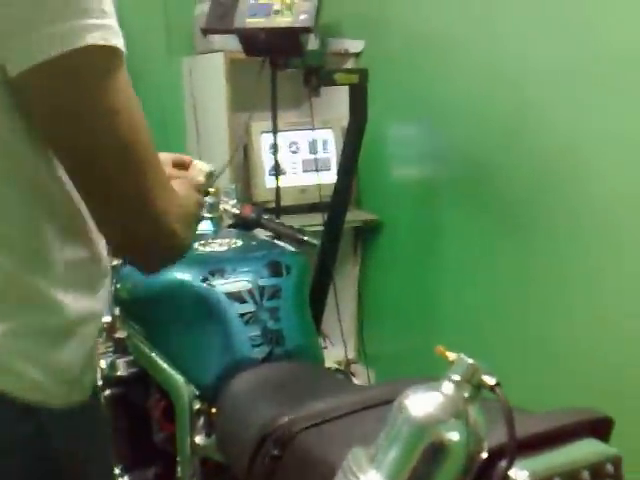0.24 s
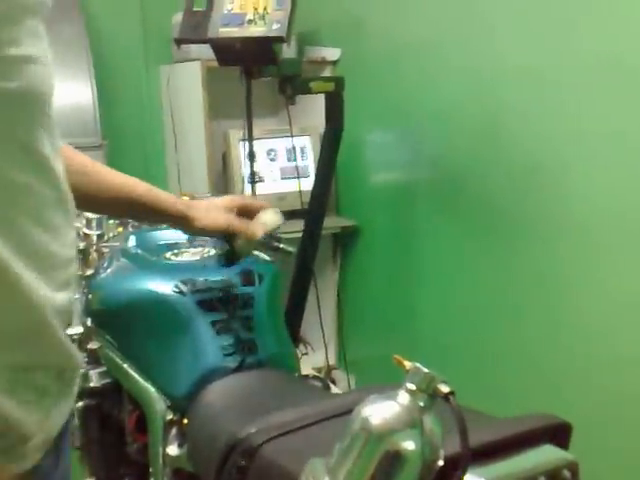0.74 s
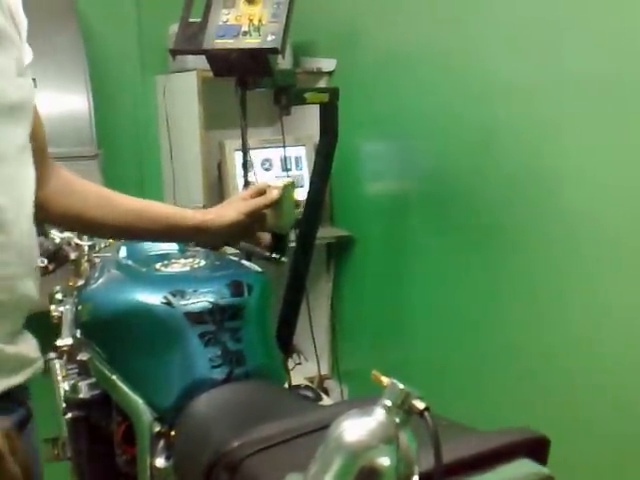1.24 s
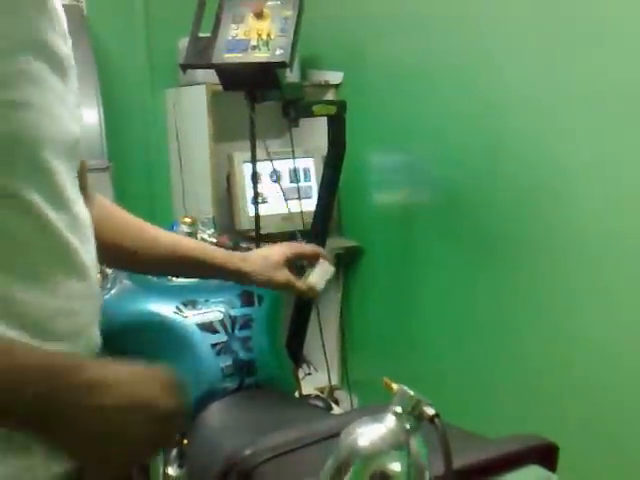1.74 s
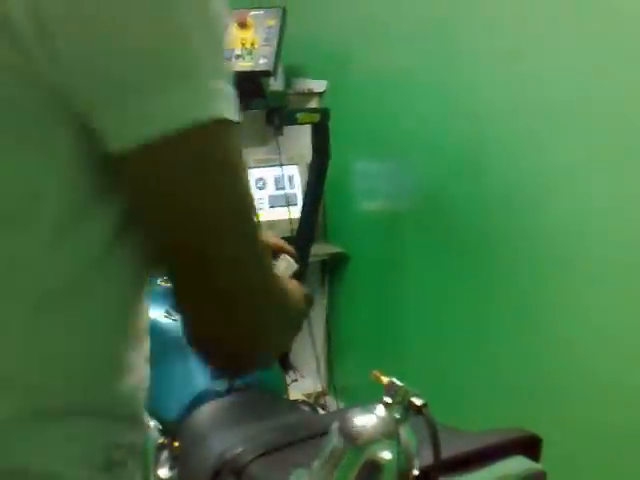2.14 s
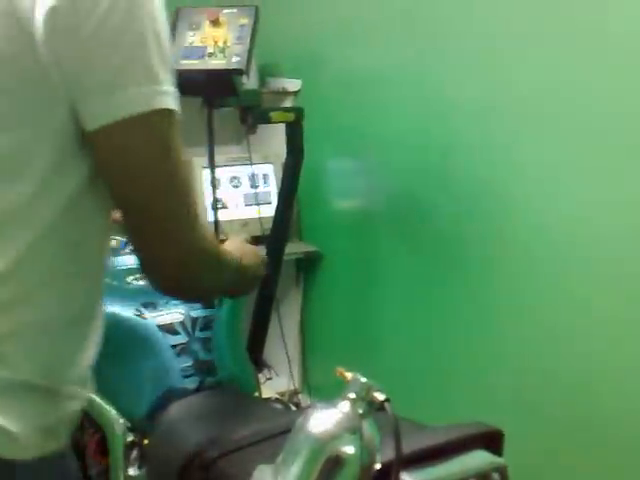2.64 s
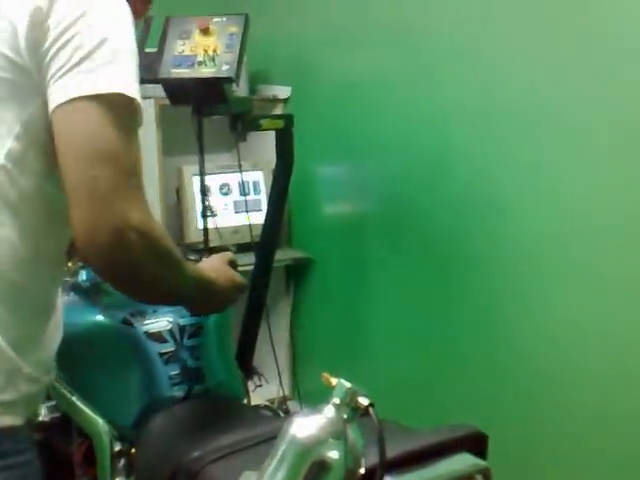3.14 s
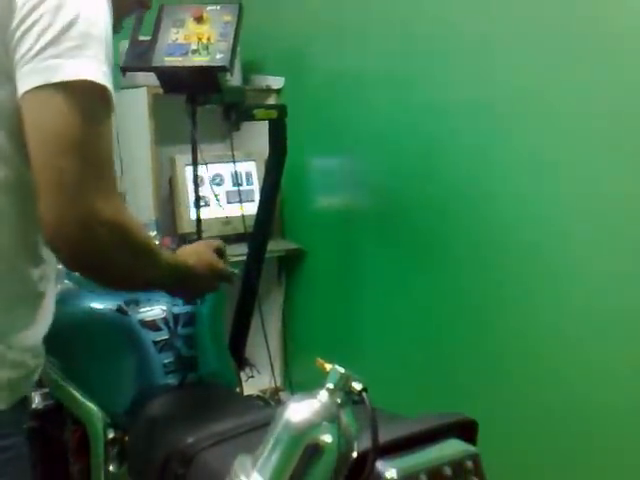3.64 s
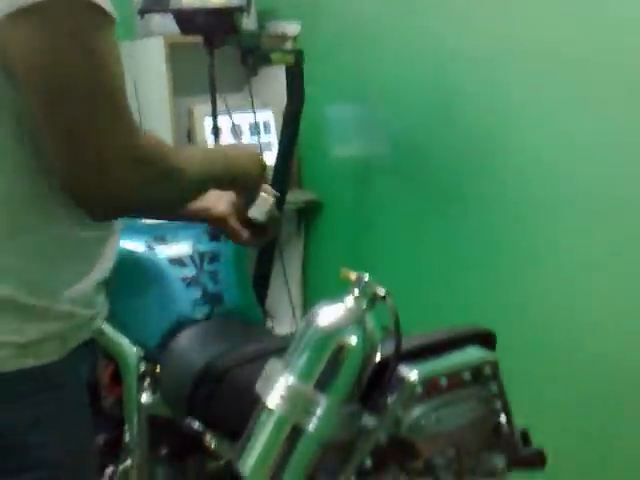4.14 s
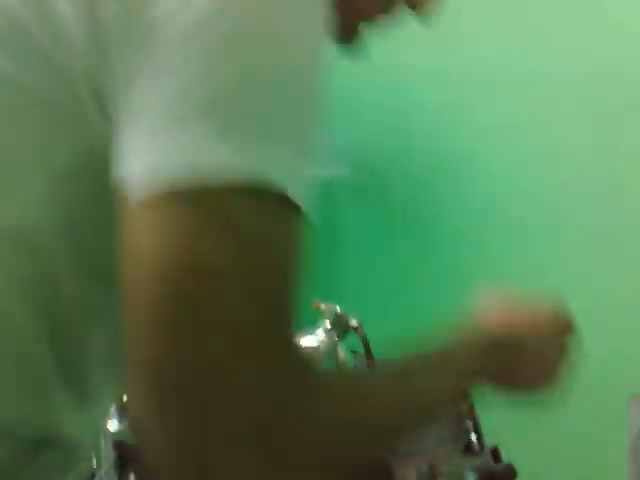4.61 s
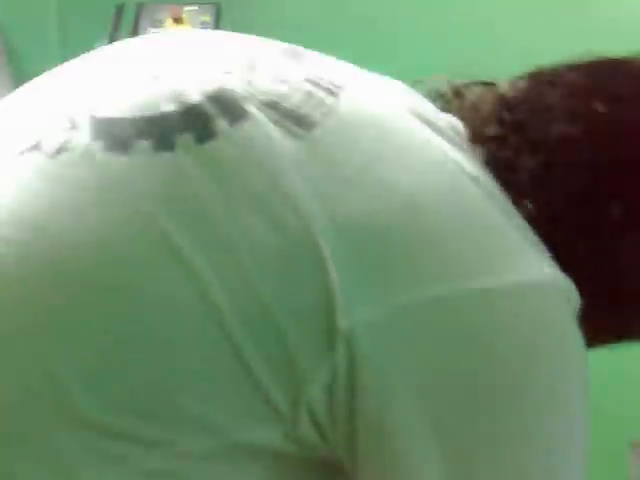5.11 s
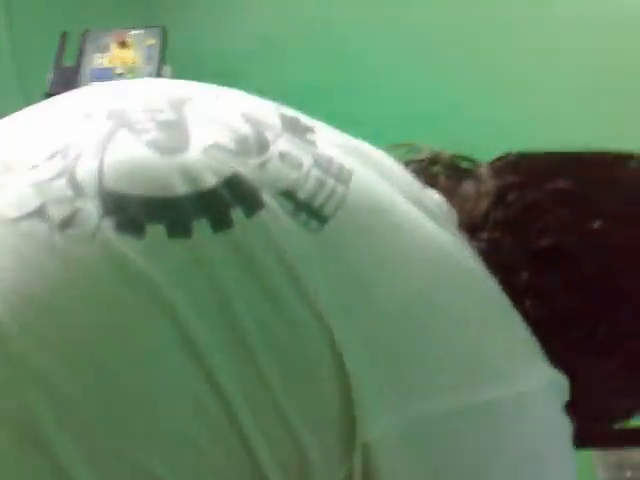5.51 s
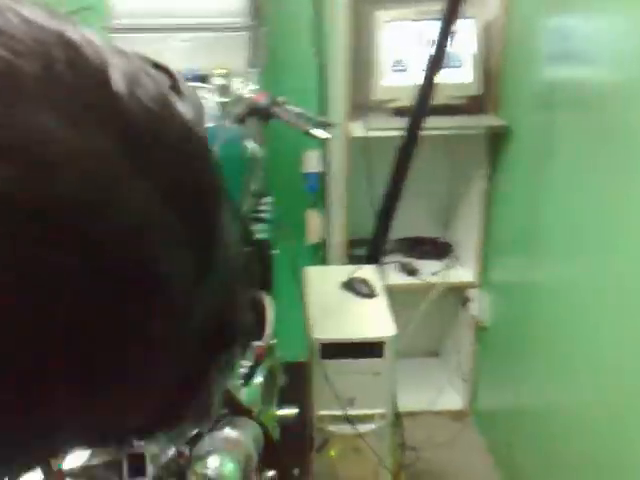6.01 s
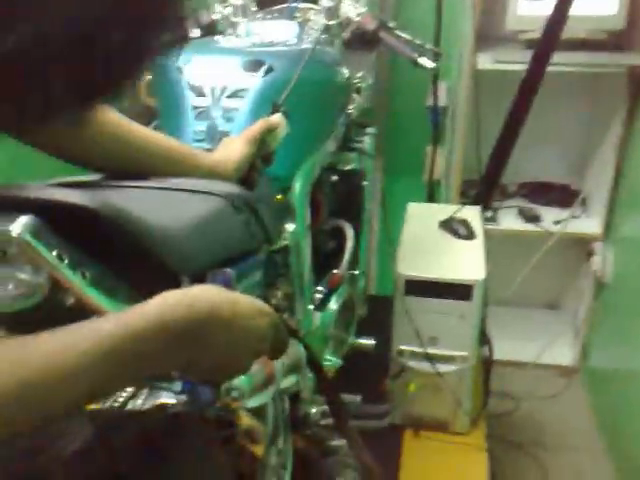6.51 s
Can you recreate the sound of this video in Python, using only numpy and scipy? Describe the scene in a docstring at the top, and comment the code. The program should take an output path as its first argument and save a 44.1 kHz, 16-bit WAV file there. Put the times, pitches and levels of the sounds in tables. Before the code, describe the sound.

Close in a small room, a clattering motorcycle engine idles and is switched off while a whining blower keeps running.

```python
"""Booming and clatter, close by in a small room: a four-cylinder motorcycle at a fast, lumpy idle on a
test stand. Its firings ring the pipes and the room, its valve gear the metal, until it is switched off.
The cooling blower runs on: as the gain control recovers, the roar of its air and the thin whine of its
blades come up. The microphone moves round the bike; near the end the sound drops out for a moment."""
import sys
import numpy as np
from scipy import signal
from scipy.fft import rfft, irfft
from scipy.io import wavfile
from scipy.ndimage import uniform_filter1d

SR = 44100
rng = np.random.default_rng(int(sys.argv[2]) if len(sys.argv) > 2 else 0)


def wav_out(sig):
    """Save sig, one row per channel (or a flat mono array), as 16-bit PCM at SR to the path in sys.argv[1]."""
    wavfile.write(sys.argv[1], SR, np.round(np.clip(np.atleast_2d(sig).T, -1, 1) * 32767).astype(np.int16))


N = 298116
TIME = np.arange(N) / SR

# spectra of the air's roar, low buffeting and hiss: f/Hz, relative level/dB
ROAR_COLOUR = [(60, -10.5), (130, 2), (270, 2.5), (400, 0.5), (600, 2), (800, 1.5), (1100, -2.5),
               (1900, -1.5), (2700, -8.5), (4300, -15.5), (6000, -25.5), (8000, -37), (15500, -71)]
BUFFET_COLOUR = [(15, -31), (30, -9), (58, 2.5), (72, 7.5), (97, 5.5), (115, -2.5), (135, 5), (170, -4.5),
                 (230, -7.5), (400, -58)]
HISS_COLOUR = [(1500, -17.5), (3500, 1.5), (5200, 0.5), (6500, -3), (7800, -11.5), (10000, -9),
               (12000, -14), (15500, -19)]
# the blower's treble as the microphone moves round: t/s, level/dB
HISS_LEVEL = [(4.05, -51), (4.45, -49), (5.0, -43.5), (6.0, -43), (6.35, -38), (6.76, -40)]
# the microphone passes through the blade tones' standing waves: t/s, lower level/dB, upper level/dB
WHINE_LEVELS = [(3.6, -31, -33), (4.05, -29, -40), (4.42, -27.5, -33.5), (4.65, -30.5, -37),
                (5.3, -31.5, -29), (5.7, -26.5, -44), (6.0, -27.5, -49), (6.35, -33.5, -29.5),
                (6.76, -42, -33)]
# faint wavering hums, the lowest being the room ringing in the blower's air: f/Hz, level/dB
FAINT_HUMS = [(212, -39.5), (283, -44), (425.3, -46.5), (591.5, -43)]
# swells of rumble: t/s, length/s, f/Hz, width/Hz, level/dB
RUMBLE_SWELLS = [(6.49, .22, 132, 13, -18.5), (6.2, 0.63, 277, 99, -29)]
# the hunting idle: t/s, speed/(four-stroke cycles a second)
IDLE_SPEED = [(0.0, 11.9), (0.25, 12.5), (0.49, 11.5), (0.77, 12.1), (1.04, 11.5), (1.15, 12.1),
              (1.34, 12.3), (1.55, 11.7), (1.76, 11.9), (2.09, 12.7), (2.22, 11.7), (2.36, 11.5),
              (2.64, 12.3), (2.73, 12.3), (2.83, 11.7), (3.55, 12.4)]
# hard taps on metal: t/s, relative level/dB
HARD_TAPS = [(1.1608, -27), (1.5733, -16), (1.9056, -10), (2.277, -19.5), (2.534, -18), (2.6354, -18),
             (3.3054, -20), (3.5678, -20)]
# ringing of the engine's metal: f/Hz, width/Hz, gain/dB
METAL_MODES = [(1700, 170, 4), (1960, 200, 5), (3430, 120, 5.5), (4160, 140, 2.5), (5100, 180, -3),
               (8500, 130, 1.5), (12170, 500, 0), (14570, 350, -9)]
# spectra of the clatter, the crank's duller rock-back and a hard tap: f/Hz, gain/dB
CLATTER_COLOUR = [(200, -22), (450, 9), (900, 5), (1900, 8), (2800, 3.2), (4800, -1), (7200, -6.5),
                  (10000, -7), (13500, -7), (16000, -11.5)]
ROCK_COLOUR = [(4000, 2.5), (9000, -4)]
CRACK_COLOUR = [(1500, -20), (5000, -6), (12000, 0)]
# the stopped crank rocks back once: t/s, rise/s, decay/s, level/dB
ROCK_BACK = (3.904, .008, .031, -22)
# pulses from pipes of unequal length, strong and weak in turn: place/cycle, relative level/dB
CYLINDERS = [(0, 0), (.235, -7), (.52, -2.5), (.765, -9)]
# modes of pipes and room: f/Hz, width/Hz, gain/dB
THUD_MODES = [(59, 5.5, -3.5), (63.8, 9, 0), (78.8, 10.3, -3.5), (95, 12, -22.5)]
BOOM_MODES = [(114.4, 14.2, -12.5), (145.1, 14, 1), (168, 7.8, -3), (180.5, 21.4, -2), (202.4, 9, -5),
              (211.2, 12.4, 1), (255, 20, -16.5), (277, 8.6, -3.5), (292, 9.1, -14), (338.3, 36, -17.5),
              (379.6, 13, -17), (423.4, 10, -26.5)]
# the sound cuts out briefly: t/s, gain (0-1)
DROPOUT = [(6.074, 1), (6.081, 0), (6.2603, 0), (6.2606, 1)]

BLADE_HZ, UPPER_BLADE_HZ = 534, 636
ROAR_DB, ROAR_START_DB, ROAR_EASE_S = -24, 5.5, 3.2  # the roar starts louder and eases off
BUFFET_DB, FRAY_DB = -25.5, -10.5
IDLE_CYCLES_PER_S = 11.91
CUT_S, STOP_S, COAST_LOSS = 3.54, 3.828, .35  # ignition off, crank stops, share of speed lost in between
# the valve gear is louder with speed and fainter as the microphone drifts away
VALVES_DB, VALVES_DB_PER_SPEED, VALVES_DB_PER_S = -13, 1.3, -.77
SIZZLE_DB, SIZZLE_DB_PER_S = -11, -1.5  # the running engine's smooth hiss, relative to its clatter
# the exhaust booms louder with speed and dies away once the ignition is off
BOOM_DB, BOOM_DB_PER_SPEED, BOOM_COAST_DB = -2, 3.5, -9.5
# its thud builds up at first and lasts while the pistons pump air
THUD_DB, THUD_START_DB, THUD_BUILD_S, THUD_COAST_DB = -11, -4.5, .6, -4


def amp(db):
    """Decibels to gain."""
    return 10 ** (np.asarray(db) / 20)


def unit(x):
    """Scales to rms 1."""
    return x / np.sqrt(np.mean(x ** 2) + 1e-20)


def noise():
    """White noise of rms 1."""
    return rng.standard_normal(N)


def curves(rows):
    """Each column of a table, joined by straight lines in time."""
    times, *columns = np.transpose(rows)
    return [np.interp(TIME, times, column) for column in columns]


def colour(x, points):
    """Filters by a spectrum of (f/Hz, gain/dB) points."""
    hz, db = np.transpose(points)
    f = np.fft.rfftfreq(N, 1 / SR)
    return irfft(rfft(x) * amp(np.interp(np.log(f + 1), np.log(hz), db)), N)


def drift(rate_hz):
    """Slow random wander of rms 1."""
    frames = 2048
    f = np.fft.rfftfreq(frames, N / SR / frames)
    slow = irfft(rfft(rng.standard_normal(frames)) / (1 + (f / rate_hz) ** 4))
    return np.interp(TIME, np.linspace(0, N / SR, frames), unit(slow))


def ring(x, modes):
    """Sum of resonances, each with its own peak gain."""
    return sum(amp(db) * signal.lfilter(*signal.iirpeak(hz, hz / width, SR), x)
               for hz, width, db in modes)


def resound(x, modes):
    """Steep-sided resonances that ring on after each pulse (minimum phase)."""
    f = np.fft.rfftfreq(N, 1 / SR)
    power = sum((amp(db) / (1 + (2 * (f - hz) / width) ** 2)) ** 2 for hz, width, db in modes)
    cepstrum = irfft(np.log(power) / 2, N)
    cepstrum[1:N // 2] *= 2
    cepstrum[N // 2 + 1:] = 0
    return irfft(rfft(x) * np.exp(rfft(cepstrum)), N)


def fade(x, decay_s):
    """Gives each impulse an exponential tail."""
    return signal.lfilter([1], [1, -np.exp(-1 / (decay_s * SR))], x)


def steadied(x, samples):
    """Holds the running rms near 1, keeping any throb faster than the window."""
    power = uniform_filter1d(x ** 2, samples)
    return x / np.sqrt(abs(power) + .012 * power.mean())


def tone(hz, waver_hz, flutter_db):
    """A tone that wavers in the moving air."""
    phase = 2 * np.pi * np.cumsum(hz + waver_hz * drift(7.83)) / SR
    return np.sqrt(2) * np.sin(phase) * amp(flutter_db * drift(7.2))


def blower():
    """The air stream, the whine of the blades and faint wavering hums, heard from a moving microphone."""
    hiss_db, = curves(HISS_LEVEL)
    lower_db, upper_db = curves(WHINE_LEVELS)
    roar_db = ROAR_DB + ROAR_START_DB * np.maximum(1 - TIME / ROAR_EASE_S, 0)
    roar = amp(roar_db) * unit(colour(noise(), ROAR_COLOUR))
    hiss = amp(hiss_db) * unit(colour(noise(), HISS_COLOUR))
    buffet = amp(BUFFET_DB + 1.2 * drift(4.4)) * unit(colour(noise(), BUFFET_COLOUR))
    whine = amp(lower_db) * tone(BLADE_HZ, waver_hz=1.3, flutter_db=1)
    whine += amp(upper_db) * tone(UPPER_BLADE_HZ, waver_hz=1.8, flutter_db=2)
    turbulence = unit(resound(noise(), [(BLADE_HZ, 70, 0), (UPPER_BLADE_HZ, 60, -2)]))
    whine += amp(lower_db + FRAY_DB) * turbulence  # frays the tones
    hum = sum(amp(db) * tone(hz, waver_hz=2.58, flutter_db=4.5) for hz, db in FAINT_HUMS)
    return (roar + hiss) * amp(.47 * drift(25)) + buffet + whine + hum


def rumble():
    """Short bands of low rumble swell and die."""
    swells = np.zeros(N)
    for start_s, length_s, hz, width, db in RUMBLE_SWELLS:
        arch = np.sin(np.pi * np.clip((TIME - start_s) / length_s, 0, 1))
        swells += amp(db) * arch * steadied(resound(noise(), [(hz, width, 0)]), samples=4000)
    return swells


def crank():
    """Speed in cycles a second, and how far the coast-down has gone (0-1)."""
    coast = np.clip((TIME - CUT_S) / (STOP_S - CUT_S), 0, 1)
    return curves(IDLE_SPEED)[0] * (1 - COAST_LOSS * coast ** 1.5), coast


def stopping(release_s):
    """Holds at 1 until the crank stops, then dies away."""
    return np.exp(-np.maximum(TIME - STOP_S, 0) / release_s)


def strokes(speed, place, scatter_db, jitter_s):
    """One impulse each time the engine passes a place in its cycle, uneven in size and timing."""
    cycles = np.cumsum(speed) / SR
    passes = np.flatnonzero(np.diff(np.floor(cycles - place)) > 0)
    size, late = rng.standard_normal((200, 2))[:len(passes)].T
    train = np.zeros(N)
    train[np.clip(passes + (late * jitter_s * SR).astype(int), 0, N - 1)] = amp(scatter_db * size)
    return train


def ticks():
    """Now and then a harder tap rings the metal's highest modes."""
    blows = np.zeros(N)
    for at_s, db in HARD_TAPS:
        blows[round(at_s * SR)] = amp(db)
    crack = fade(blows, decay_s=.0012) * noise()
    return amp(-1) * colour(crack, CRACK_COLOUR) + amp(20.5) * ring(crack, METAL_MODES[5:])


def valve_gear(speed):
    """Eight tappets tick each cycle over the rattle of the cam chain; both ring the metal."""
    tappet_places = (np.arange(8) + rng.uniform(-.3, .3, 8)) / 8
    taps = sum(strokes(speed, place, scatter_db=2.5, jitter_s=.0005) for place in tappet_places)
    # one knock in each turn of the crank
    knocks = sum(strokes(speed, place, scatter_db=4, jitter_s=.0005) for place in (0, .5))
    links = (rng.random(N) < 500 / SR) * amp(3.3 * np.minimum(rng.exponential(1, N), 5))
    force = 1.7 + .38 * fade(taps, .0082) + .37 * fade(knocks, .009) + .5 * fade(links, .0004)
    rattle = colour(force * noise(), CLATTER_COLOUR)
    # the blows land in changing places, so each mode rings in bursts of its own
    ringing = sum(ring(force * noise(), [mode]) * amp(2.45 * drift(21)) for mode in METAL_MODES)
    clatter = unit(rattle + amp(2) * ringing)
    sizzle = amp(SIZZLE_DB + SIZZLE_DB_PER_S * TIME) * unit(colour(noise(), HISS_COLOUR))
    level_db = VALVES_DB + VALVES_DB_PER_SPEED * (speed - IDLE_CYCLES_PER_S) + VALVES_DB_PER_S * TIME
    return amp(level_db) * stopping(release_s=.021) * (clatter + sizzle) + rock_back(clatter)


def rock_back(clatter):
    """The stopped crank rocks back once with a duller rattle."""
    peak_s, rise_s, decay_s, db = ROCK_BACK
    envelope = np.exp(np.minimum((TIME - peak_s) / rise_s, (peak_s - TIME) / decay_s))
    return amp(db) * envelope * colour(clatter, ROCK_COLOUR)


def room_smear(x, spread_s):
    """The room holds some pitches longer than others, which smears the pulses into a burble."""
    f = np.fft.rfftfreq(N, 1 / SR)
    grid_hz = np.arange(0, 1000, 16)
    delay_s = spread_s * np.interp(f, grid_hz, rng.random(len(grid_hz)))
    return irfft(rfft(x) * np.exp(-2j * np.pi * np.cumsum(delay_s) * f[1]), N)


def exhaust(speed, coast):
    """Each firing sends a pulse and a puff of gas into the modes of the pipes and the room."""
    # each cylinder burns now better, now worse, so the idle lopes
    firings = sum(amp(db + 2.5 * drift(3)) * strokes(speed, place, scatter_db=2.2, jitter_s=.0003)
                  for place, db in CYLINDERS)
    puffs = amp(-29) * fade(firings, decay_s=.008) * noise()
    drive = room_smear(firings + puffs, spread_s=.02)
    boom_db = BOOM_DB + BOOM_DB_PER_SPEED * (speed - IDLE_CYCLES_PER_S) + BOOM_COAST_DB * coast ** 2.5
    thud_start_db = THUD_START_DB * np.maximum(1 - TIME / THUD_BUILD_S, 0)
    thud_db = THUD_DB + thud_start_db + THUD_COAST_DB * coast ** 3
    boom = amp(boom_db) * steadied(resound(drive, BOOM_MODES), samples=4000)
    thud = amp(thud_db) * steadied(resound(drive, THUD_MODES), samples=7000)
    return stopping(release_s=.01) * (boom + thud)


def scene():
    """The room at one microphone: the crank drives exhaust and valve gear; the blower never stops."""
    speed, coast = crank()
    return (exhaust(speed, coast) + valve_gear(speed) + ticks() + blower() + rumble())[None]


def gain_control(x, threshold_db, recovery_db_per_s):
    """Turns the microphone down at once for loud sound and creeps back up."""
    power_db = 10 * np.log10(abs(uniform_filter1d(x[0] ** 2, size=9000)) + 1e-12)
    recovery_db = TIME * recovery_db_per_s
    held_db = np.maximum.accumulate(power_db + recovery_db) - recovery_db
    return x * amp(-np.maximum(held_db - threshold_db, 0))


def record(dry):
    """After the microphone: gain control, soft overload, the brief dropout and the band limit."""
    x = gain_control(dry, threshold_db=-10, recovery_db_per_s=6.5)
    x = x / (1 + (x / .77) ** 4) ** (1 / 4)
    x = x * curves(DROPOUT)[0]
    lowpass = signal.firwin(511, cutoff=15780, window=("kaiser", 9), fs=SR)
    return signal.oaconvolve(x, lowpass[None], "same")


dry = scene()
out = record(dry)
wav_out(out)
```